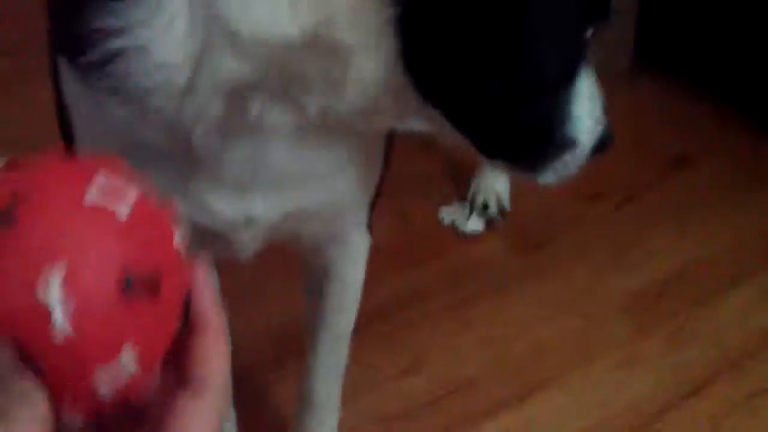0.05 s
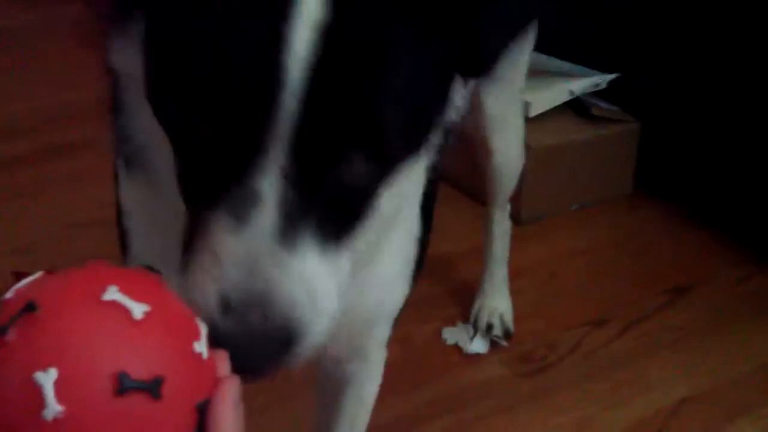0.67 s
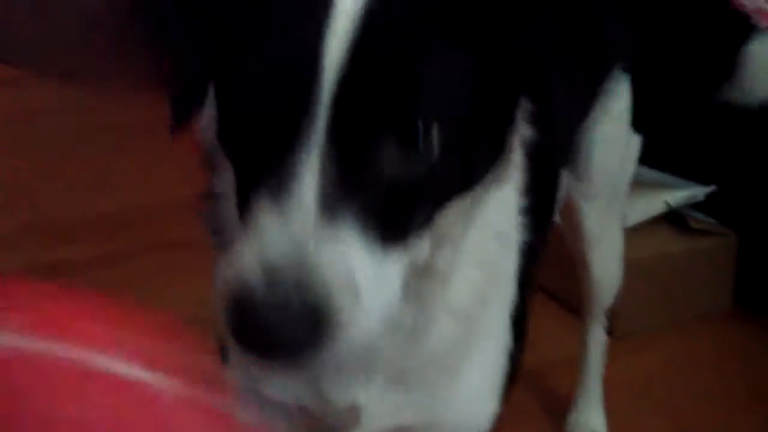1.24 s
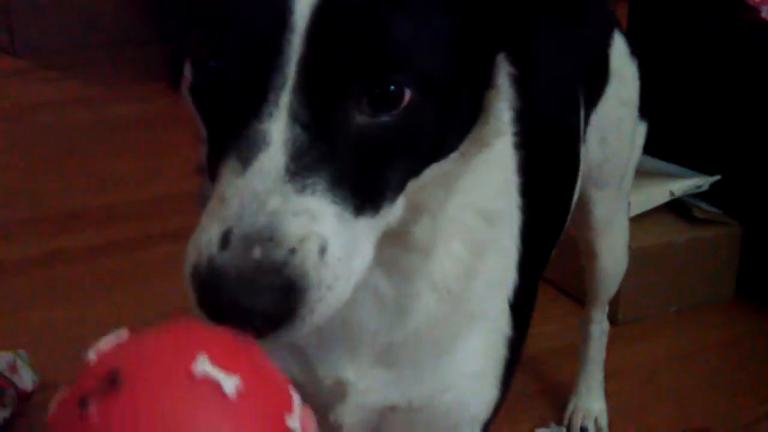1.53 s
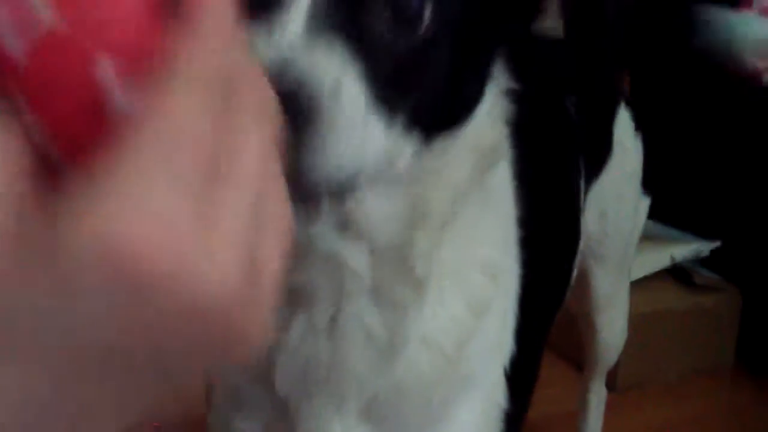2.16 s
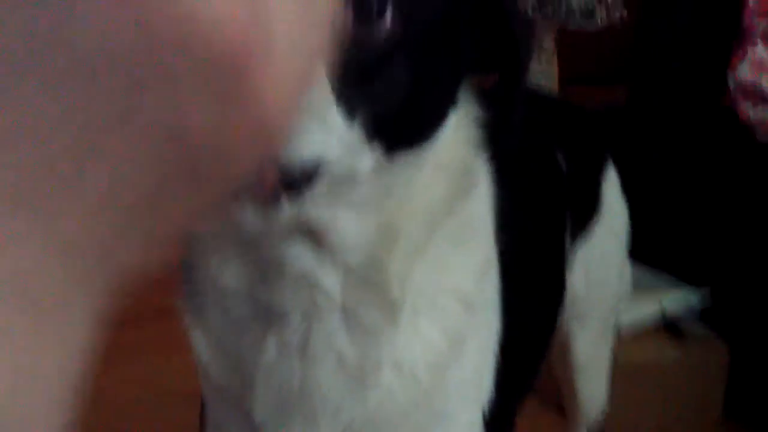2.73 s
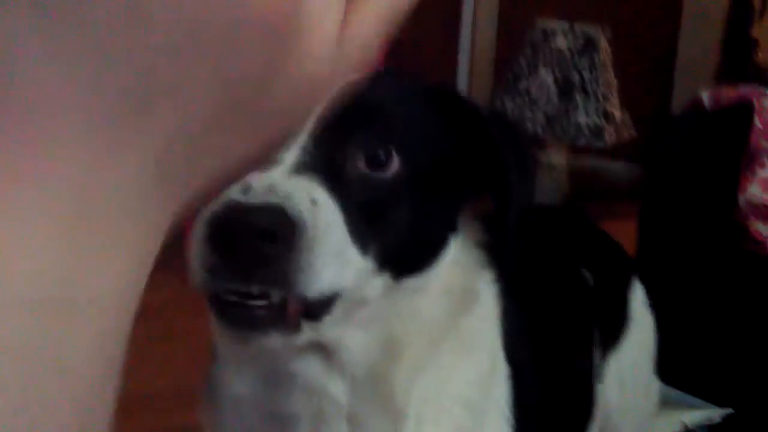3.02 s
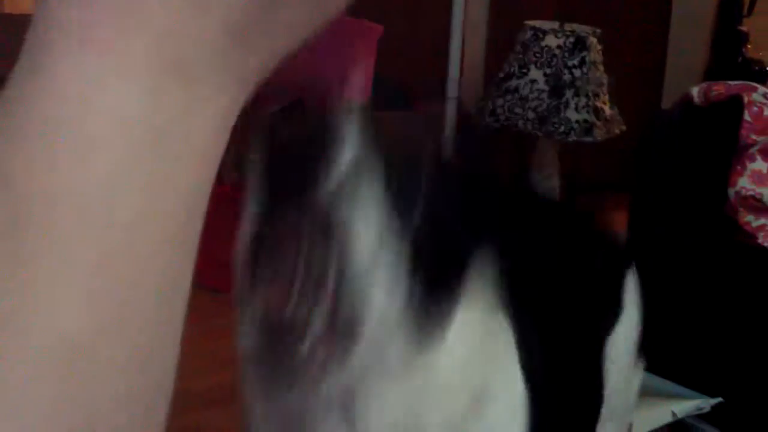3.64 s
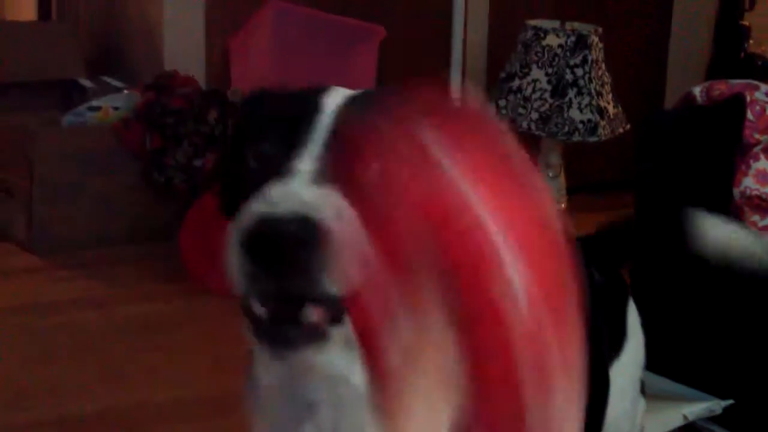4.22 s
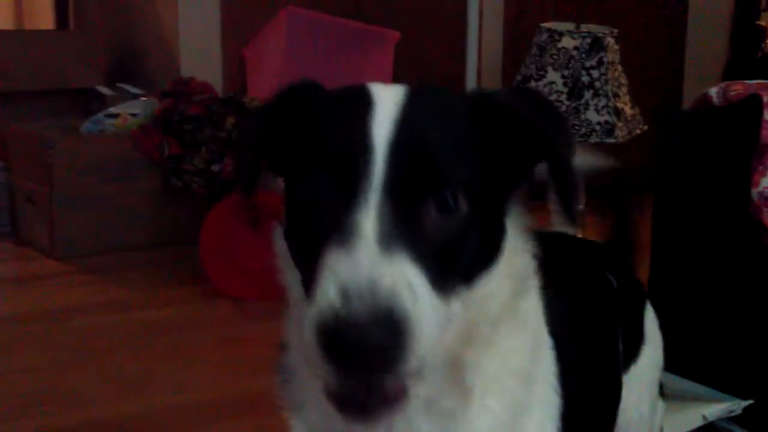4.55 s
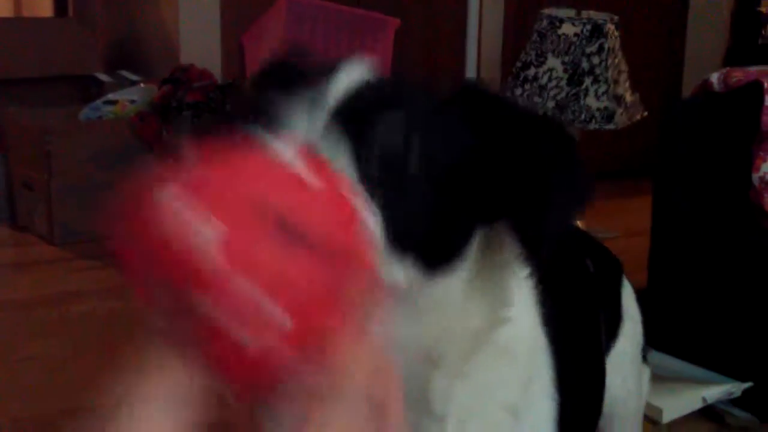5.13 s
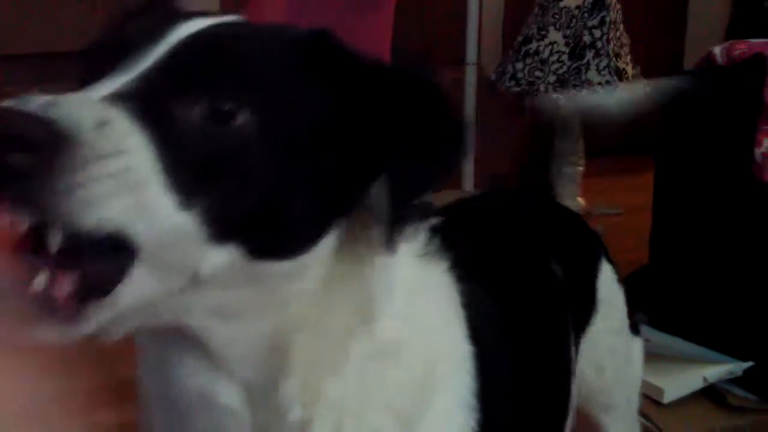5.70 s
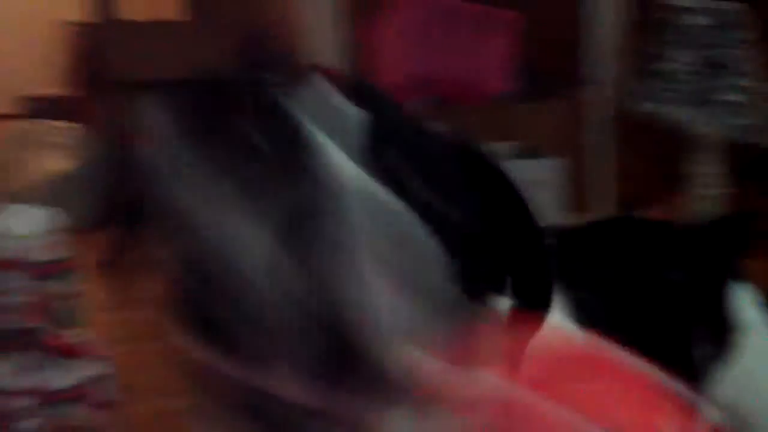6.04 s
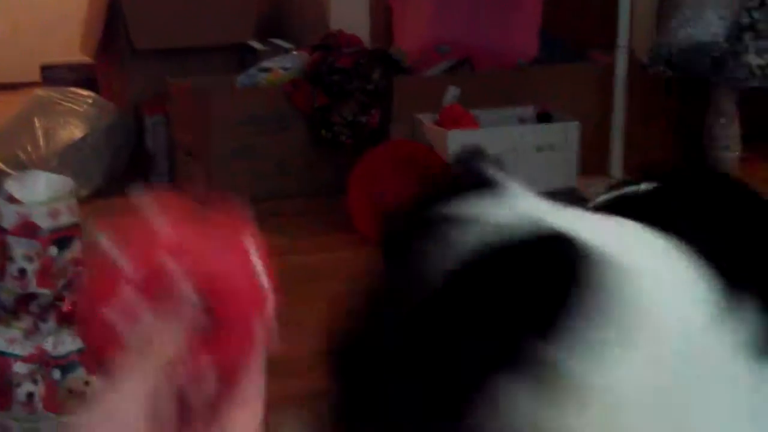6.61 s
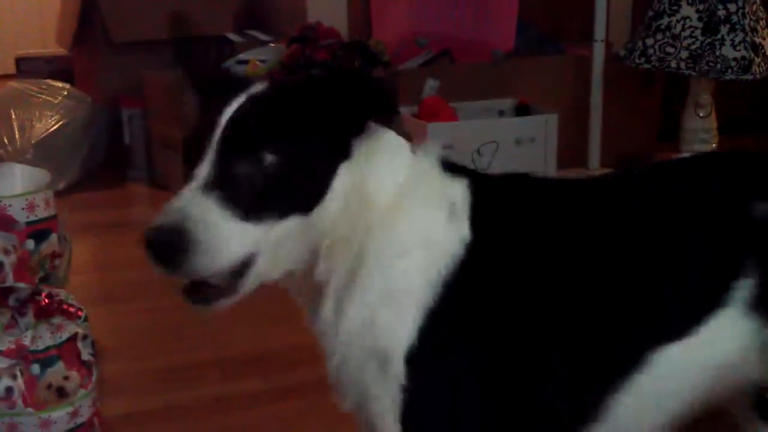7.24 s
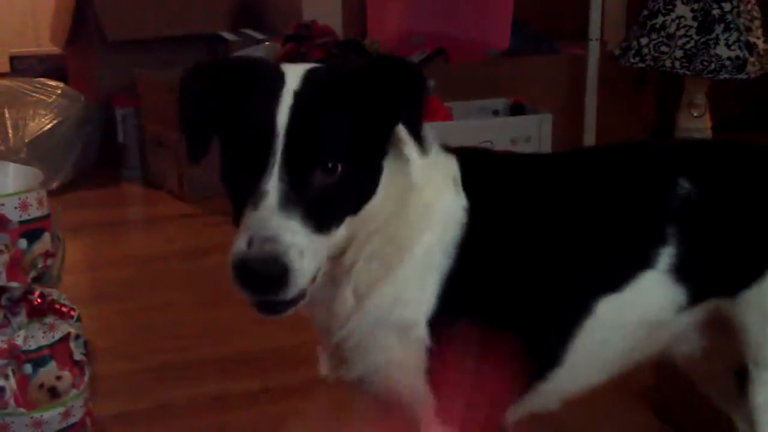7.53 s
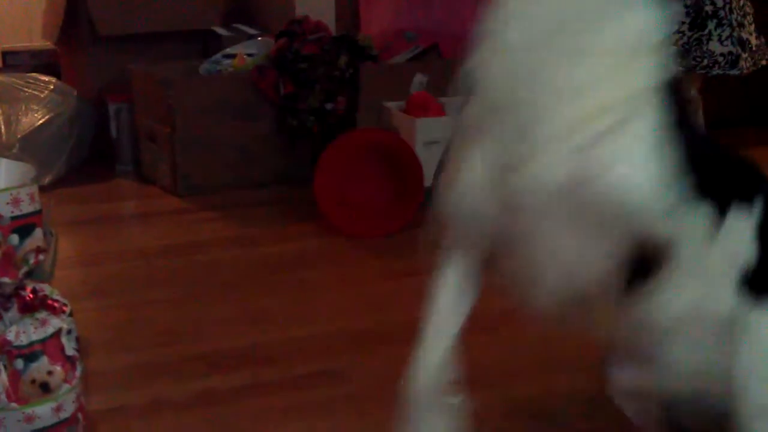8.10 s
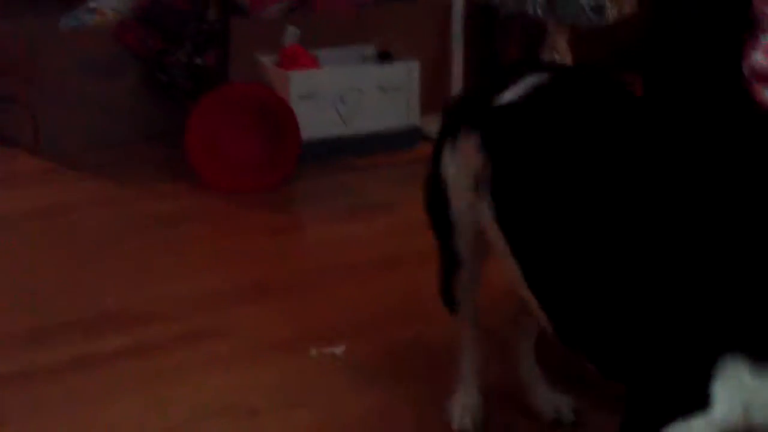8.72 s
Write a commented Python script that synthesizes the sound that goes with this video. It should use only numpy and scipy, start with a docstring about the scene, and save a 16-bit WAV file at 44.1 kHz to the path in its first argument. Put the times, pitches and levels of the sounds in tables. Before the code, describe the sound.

Close, harsh squeaks from a rubber dog ball go in and out rapidly indoors, ending with a scuff and sharp knocks on wood.

```python
"""A harsh, arching squeal, close by in a living room, then a steadier, cleaner note: a hollow rubber ball
is squeezed again and again, driving air out through a reed and sucking it back in. The reed chops the
flow into harmonics, a pipe resonance colours them, and the shell pops as it flexes. At last the ball is
thrown and a dog scrambles after it over the wooden floor. The loudest moments overload the microphones."""
import sys
import numpy as np
from scipy import signal
from scipy.fft import rfft, irfft, next_fast_len
from scipy.io import wavfile
from scipy.ndimage import uniform_filter1d

SR = 44100
rng = np.random.default_rng(int(sys.argv[2]) if len(sys.argv) > 2 else 0)


def generate_wav(signal):
    """Clip the signal to [-1, 1] and save it as 16-bit WAV at the path in sys.argv[1]."""
    frames = np.transpose(np.atleast_2d(signal))
    scaled = np.clip(frames, -1, 1) * 32767
    pcm = np.round(scaled).astype(np.int16)
    wavfile.write(sys.argv[1], SR, pcm)


N = 386316

# spectrum of the room tone: f/Hz, level/dB
ROOM_TONE_COLOUR = [(45, -43), (130, -4.5), (1000, -4.5), (3000, -18.5), (9000, -25), (12000, -50)]
# reverberation time of the room: f/Hz, t60/s
ROOM_T60 = [(200, 0.48), (1400, 0.33), (9000, 0.31)]
# balance of the two microphones: f/Hz, left minus right/dB
MIC_BALANCE = [(2300, 1.5), (5500, -0.5), (9000, -2.5)]
# rasping scuffs as the ball is thrown: peak t/s, level/dB, rise/s, fall/s
SCUFFS = [(7.747, -40, 0.014, 0.026), (7.812, -3.5, 0.012, 0.02)]
# spectrum of a scuff: f/Hz, level/dB
SCUFF_COLOUR = [(200, -24.5), (950, -9), (2000, -2), (2400, -4.5), (2800, -0.5), (3250, -9), (8000, -24.5),
                (14000, -47.5)]
# claws, paws and ball striking the floor: t/s, level/dB, t60/s, relative thump/dB
KNOCKS = [(7.548, -43.5, 0.1, -9.5), (7.578, -48, 0.7, -2.5), (8.016, -47, 0.5, -0.5),
          (8.178, -40.5, 0.16, -11.5), (8.303, -10, 0.27, -11.5), (8.319, -19.5, 0.32, 8),
          (8.463, -15, 0.07, -38), (8.502, 11.5, 0.02, -25.5), (8.524, 9, 0.02, -41),
          (8.58, -10, 0.05, -26), (8.68, -9, 0.13, -28.5), (8.698, -14.5, 0.37, -33)]
# spectrum of struck wood: f/Hz, level/dB
WOOD_COLOUR = [(150, -30), (1700, -0.5), (2800, -3.5), (4400, -0.5), (6200, -10.5), (8000, -5),
               (10500, -12.5), (14000, -40)]
# modes excited by a knock: f/Hz, level/dB, t60/s
KNOCK_MODES = [(2085, -9.5, 0.12), (3190, -5, 0.14), (4280, -2, 0.15)]
# spectrum of the thump under a knock or pop: f/Hz, level/dB
THUMP_COLOUR = [(50, -45.5), (190, -5.5), (290, -2), (440, -14.5), (770, -9), (3000, -51)]
# the shell flexing and popping back into shape: t/s, level/dB, t60/s, relative thump/dB, rise/s
POPS = [(0.481, -2.5, 0.0028, -31.5, 0.0053), (1.626, -25.5, 0.2, -9, 0.0021),
        (6.19, -18, 0.11, -19, 0.0022), (6.237, -17, 0.2, -20, 0.00093), (6.79, -1, 0.08, -25.5, 0.0087),
        (7.117, -21.5, 0.21, -28, 0.0064), (7.342, -20.5, 0.1558, -14, 0.0018)]
# spectrum of the rubber shell: f/Hz, level/dB
SHELL_COLOUR = [(400, -14.5), (900, 1.5), (9000, -0.5), (13000, -32.5)]
# air sighing in past the stalled reed until the ball is round: t/s, length/s, level/dB
SIGHS = [(0.388, 0.15, -36.5), (1.541, 0.1, -37.5), (6.093, 0.12, -29.5), (7.25, 0.1, -26)]
# spectrum of a sigh: f/Hz, level/dB
SIGH_COLOUR = [(100, -15), (900, -1), (6200, -5.5), (8100, 7.5), (12000, -34.5)]
# spectra of the turbulence, inward and outward: f/Hz, level/dB
IN_RUSH = [(450, -49.5), (4000, -2.5), (8100, 0.5), (10000, -9), (12000, -44.5)]
OUT_RUSH = [(220, -27.5), (1000, -11), (3000, -3), (7200, 2), (10500, -8), (16000, -31.5)]
# spectra of the reed before the pipe resonance, inward and outward: f/Hz, level/dB
IN_COLOUR = [(450, -54), (880, -14), (1900, -8.5), (2850, -12.5), (3800, -6.5), (6400, -12.5), (7600, -4),
             (9900, -3.5), (11400, -27.5), (16000, -55)]
OUT_COLOUR = [(400, -48.5), (850, -19), (1400, -15.5), (3000, -17.5), (7000, -6), (10300, -17),
              (12000, -37.5), (16000, -47)]
# air sucked in by the freed ball:
# t/s, length/s, top f/Hz, sag/(Hz/s), level/dB, opening accent/dB, low harmonics/dB, pipe f/Hz
REFILLS = [ (0.136, 0.26, 1117, 1036, -14, 2.5, -3, 7740), (1.217, 0.32, 1031, 386, -12.5, -4, 0, 8200),
           (1.937, 0.099, 965, 90, -10, -7.5, -0.5, 7560), (2.229, 0.086, 980, 91, -8.5, -6.5, -2.5, 8000),
           (2.475, 0.082, 983, 99.5, -9.5, -3, -1, 8300), (2.696, 0.43, 984.3, 36.4, -12, 2, -1, 8940),
           (3.378, 0.18, 954, 81, -10.5, -7.5, -2.5, 9040), (3.771, 0.17, 1001, 156, -9.5, -9.5, -1, 9300),
           (4.125, 0.13, 974, 130, -9, -14.5, 1.5, 7750), (4.412, 0.086, 955, 123, -11.5, -4, 1.5, 8040),
           (5.638, 0.48, 966.3, 132, -12, 6, -0.5, 8830), ]
# slow refills steered by the loosening hand: pipe f/Hz, rows of (t/s, f/Hz, level/dB, low harmonics/dB)
HELD_REFILLS = [ (8670, [(4.752, 914, -20, -6), (4.791, 984, -13.5, 5), (4.843, 998.6, -12, 4),
                (4.999, 936.3, -12.5, 0), (5.075, 931.4, -11, -3), (5.115, 937, -10.5, -0.5),
                (5.215, 949.3, -8.5, 0), (5.272, 950.6, -12, -2.5), (5.35, 943, -11, -2),
                (5.374, 816, -20.5, 18)]), (7650, [(6.762, 864, -33, 7), (6.796, 877, -11.5, -0.5),
                (6.838, 874, -1.5, -1.5), (7.01, 927.3, -12, -1.5), (7.06, 938, -9, -2.5),
                (7.088, 950, -15.5, 9), (7.138, 949, -10.5, -3.5), (7.224, 925, -14.5, -2.5),
                (7.25, 882, -16, 0.5), (7.272, 790, -20.5, 9)]), ]
# air pushed out, the last time as the thrown ball is struck:
# t/s, length/s, top f/Hz, crest/length, push/dB, hold/dB, low harmonics/dB, relative rush/dB, pipe f/Hz
SQUEEZES = [ (-0.04, 0.16, 1539, 0.47, 16.5, -10.5, 3, -5.5, 7670),
            (1.023, 0.2, 2748, 0.45, -0.5, -9, 0.5, 5, 7200),
            (1.698, 0.23, 2663, 0.49, 0, -10, 4, 6.5, 7140),
            (2.048, 0.17, 1640, 0.49, -4.5, -8.5, -0.5, -17, 7100),
            (2.328, 0.14, 1194, 0.47, -3.5, -8.5, -1, -23, 7000),
            (2.575, 0.099, 989, 0.4, -4, -7, 0.5, -24, 7050),
            (3.14, 0.21, 1522, 0.43, -4.5, -8.5, 3, -11, 6630),
            (3.585, 0.18, 1502, 0.48, -4.5, -10, 4, -5.5, 8550),
            (3.958, 0.15, 1185, 0.43, -4.5, -9.5, 3.5, -15, 5970),
            (4.271, 0.116, 982, 0.4, -4, -9, 1.5, -27.5, 7220),
            (4.503, 0.13, 1171, 0.46, -1.5, -12.5, 0.5, -17.5, 7050),
            (4.696, 0.055, 899, 0.17, -1.5, -13, -3.5, -15.5, 6980),
            (5.428, 0.17, 956, 0.61, -6, -11.5, 2.5, -27.5, 8600),
            (8.697, 0.037, 882, 0.21, 1, -15.5, -6, -16.5, 7000), ]

# the reed's response to each direction of flow
INWARD = dict(colour=IN_COLOUR, rush_colour=IN_RUSH, pipe_db=7, rasp_db=-3.5, hiss_db=-49.5, gasp_db=-9,
              attack_s=0.01, release_s=0.022, rush_rise_s=0.01, rush_fall_s=0.085,
              jitter=0.032, wobble=0.0014, shade_db=2.0, flutter_db=0.96)
OUTWARD = dict(colour=OUT_COLOUR, rush_colour=OUT_RUSH, pipe_db=8, rasp_db=-4, hiss_db=-24, gasp_db=-13,
               attack_s=0.0028, release_s=0.0044, rush_rise_s=0.012, rush_fall_s=0.058,
               jitter=0.025, wobble=0.003, shade_db=2.06, flutter_db=1.5)
PIPE_WIDTH_HZ, LOW_TOP_HZ, BAND_EDGE_HZ = 870, 5840, 15800
RASP_GLIDE_PER_S, RASP_LOW_DB = 17, -4  # a fast glide of log pitch rasps and starves the low harmonics
OVERBLOW_HZ, OVERBLOW_SPAN_HZ, HALF_HARMONIC_DB = 1280, 210, -15
BREAK_ARCH, BREAK_WIDTH, BREAK_JUMP = 0.66, 0.019, 0.48  # register jump, in shares of the pressure arch


def amp(db):
    """Decibels are logarithmic: 20 dB is a factor of ten in amplitude."""
    return 10 ** (np.asarray(db) / 20)


def unit(x):
    """Normalisation to rms 1."""
    return x / np.sqrt(np.mean(x ** 2))


def curve_at(points, hz):
    """Interpolation on a logarithmic frequency axis."""
    f, value = np.transpose(points)
    return np.interp(np.log(hz + 1), np.log(f), value)


def add(mix, start, sound):
    """Superposition: a stereo sound sums into the mix from its start time."""
    part = mix[:, max(round(start * SR), 0):][:, :sound.shape[1]]
    part += sound[:, :part.shape[1]]


def noise(colour, n, width=0.8):
    """Spectral shaping of white noise; width is the ratio of side to mid signal."""
    padded = next_fast_len(n, True)
    gain = amp(curve_at(colour, np.fft.rfftfreq(padded, 1 / SR)))
    mid, side = irfft(rfft(rng.standard_normal((2, padded))) * gain, padded)[:, :n]
    return unit(np.array([mid + width * side, mid - width * side]))


def drift(t, max_hz):
    """Random sinusoids beat together into a smooth fluctuation of rms near 1."""
    speeds, phases = rng.random((2, 8, 1))
    return np.sin(2 * np.pi * (max_hz * speeds * t + phases)).sum(0) / 2


def room_tone(level_db=-65.5):
    """Stationary noise forms the faint floor of the scene."""
    return amp(level_db) * noise(ROOM_TONE_COLOUR, N)


def reverberate(direct, early_db=-6.5, tail_db=-8.5):
    """Reflection: echoes from floor and furniture, and a diffuse tail that decays exponentially."""
    hz, frame_s, spectrum = signal.stft(rng.standard_normal((2, SR)), SR)
    decay = amp(-60 * frame_s / curve_at(ROOM_T60, hz)[:, None])
    tail = signal.istft(spectrum * decay, SR)[1][:, :SR]
    early = np.zeros_like(tail)
    delay_s = rng.uniform(.003, .02, size=(2, 8))
    echoes = rng.choice([-1, 1], delay_s.shape) / np.sqrt(delay_s)
    np.put_along_axis(early, (delay_s * SR).astype(int), echoes, 1)
    response = (amp(early_db) * unit(early) + amp(tail_db) * unit(tail)) / np.sqrt(SR)
    return direct + signal.fftconvolve(direct, response, axes=1)[:, :N]


def scuff(peak_s, level_db, rise_s, fall_s):
    """Friction noise swells to a peak and dies."""
    t = np.arange(-SR // 10, SR // 10) / SR
    swell = np.exp(-(np.minimum(t, 0) / rise_s) ** 2 - np.maximum(t, 0) / fall_s)
    return peak_s + t[0], noise(SCUFF_COLOUR, len(t)) * swell * amp(level_db)


def impact(colour, rise_s, start, level_db, t60, thump_db):
    """Impulsive excitation of wood or rubber: a dense, damped crack over a low thump."""
    t = np.arange(SR // 2) / SR
    crack = noise(colour, len(t)) / 1000 ** (t / t60)
    thump = noise(THUMP_COLOUR, len(t), width=0.062) * amp(thump_db - 273.6 * t)
    return start, amp(level_db) * (crack + thump) * (1 - np.exp(-t / rise_s))


def floor_ring(start, level_db, decay_s, thump_db, ring_db=-8, boom_hz=250, boom_db=-3, boom_t60=0.16):
    """Modal vibration: a hard knock rings the high modes; a soft, thumping one makes the floor boom."""
    t = np.arange(SR // 2) / SR
    modes = sum(amp(db - 60 * t / t60) * np.sin(2 * np.pi * (hz * t + rng.random((2, 1))))
                for hz, db, t60 in KNOCK_MODES)
    ring = modes * amp(ring_db) * np.exp(-t / decay_s) / (1 + amp(thump_db))
    boom = amp(thump_db + boom_db) * np.sin(2 * np.pi * boom_hz * t) / 1000 ** (t / boom_t60)
    return start, amp(level_db) * (ring + boom)


def sigh(start, length, level_db, grain_db=2.5):
    """Turbulence in the open vent makes a soft, rustling draught."""
    t = np.arange(0, length, 1 / SR)
    draught = noise(SIGH_COLOUR, len(t)) * signal.windows.tukey(len(t), .5)
    return start, draught * amp(level_db + grain_db * drift(t, 120))


def overblow(hz):
    """Period doubling: the degree, 0 to 1, to which the overblown reed beats strong-weak."""
    return np.clip((hz - OVERBLOW_HZ) / OVERBLOW_SPAN_HZ, 0, 1)


def reed(stroke, pipe_hz, rush_db, *, colour, rush_colour, pipe_db, rasp_db, hiss_db, gasp_db,
         attack_s, release_s, rush_rise_s, rush_fall_s, jitter, wobble, shade_db, flutter_db):
    """Source and filter: the reed chops the flow into harmonics and the pipe resonance colours them.
    Stroke columns: t/s, f/Hz, level/dB, low harmonics/dB."""
    times, pitch, level_db, low_db = np.transpose(stroke)
    t = np.arange(times[0], times[-1] + 0.067, 1 / SR)
    age, left = t - times[0], times[-1] - t
    hz = uniform_filter1d(np.interp(t, times, pitch), size=600, mode="nearest")
    rasp = np.tanh(abs(np.gradient(np.log(hz))) * SR / RASP_GLIDE_PER_S)
    # turbulence swells early in the stroke and shakes the pitch
    surge = np.exp(-(age / rush_fall_s) ** 2) * (1 - np.exp(-(age / rush_rise_s) ** 2))
    air = amp(rush_db) * surge + amp(hiss_db) + amp(rasp_db) * rasp ** 2
    slow_t, slow_hz = t[::32], hz[::32]
    slow_low_db = np.interp(slow_t, times, low_db) + RASP_LOW_DB * rasp[::32]
    shake = jitter * (air + rasp ** 2) * np.interp(t, slow_t, drift(slow_t, 400))
    shake += wobble * np.interp(t, slow_t, drift(slow_t, 70))
    cycles = np.cumsum(hz * (1 + shake)) / SR
    half_gain = amp(HALF_HARMONIC_DB) * overblow(slow_hz) * np.clip(1 + drift(slow_t, 35), 0, 2)
    tone = power = 0
    for k in np.arange(1, BAND_EDGE_HZ / hz.min(), .5 if half_gain.any() else 1):
        f = k * slow_hz
        gain_db = curve_at(colour, f) + slow_low_db * np.exp(-(f / LOW_TOP_HZ) ** 6)
        gain_db += pipe_db * np.exp(-((f - pipe_hz) / PIPE_WIDTH_HZ) ** 2)
        # the moving hand shades each harmonic and shifts it between left and right
        gain_db += shade_db * drift(slow_t, 7) + flutter_db * drift(slow_t, 60)
        shift = np.interp(t, slow_t, 0.78 * np.sqrt(k / 8) * drift(slow_t, 2))
        height = np.interp(t, slow_t, amp(gain_db) * (f < SR / 2) * (half_gain if k % 1 else 1))
        phase = 2 * np.pi * k * cycles + 0.3 * k * k  # the cavity smears each pulse
        tone = tone + height * np.cos(np.float32([phase + shift, phase - shift]))
        power = power + height ** 2 / 2
    speaking = np.clip(left / release_s, 0, 1)  # the reed stalls as the pressure runs out
    gasp = amp(gasp_db - 272 * abs(left))  # air slips on past the stalled reed
    rush = (air + gasp) * noise(rush_colour, len(t))
    sound = (speaking * tone / np.sqrt(power) + rush) / np.sqrt(1 + air ** 2)  # a strong rush chokes it
    edges = np.minimum(age / attack_s, 1) ** 2 * np.minimum(age[::-1] / 0.099, 1)
    return times[0], sound * edges * amp(np.interp(t, times, level_db))


def refill(start, length, top_hz, sag_hz_per_s, level_db, accent_db, low_db,
           open_s=0.014, close_s=0.019, accent_s=0.04, fade_s=0.034, fade_db=-12):
    """Elastic recovery drives the inward stroke: suction builds, sags as the ball rounds out, then ends."""
    age = np.arange(0, length, 1 / SR)
    left = length - age
    flat = 0.1 * np.exp(-age / open_s) + 0.22 * np.exp(-left / close_s)  # weak suction lowers the pitch
    hz = (top_hz - sag_hz_per_s * age) * (1 - flat)
    swell_db = accent_db * np.exp(-age / accent_s) + fade_db * np.exp(-left / fade_s)
    return np.column_stack([start + age, hz, level_db + swell_db, np.full(len(age), low_db)])


def squeeze(start, length, top_hz, crest, push_db, hold_db, low_db,
            onset_hz=874.5, stall_hz=818, push_share=0.42, grip_db=-1.5, spent_db=-5.5):
    """Pitch follows pressure in the outward stroke: a hard push, an easier hold, then the air is spent."""
    t = np.arange(max(start, 0), start + length, 1 / SR)
    done = (t - start) / length
    skewed = done ** (np.log(.5) / np.log(crest))
    arch = abs(np.sin(np.pi * skewed)) ** 1.4
    upper_register = (1 + np.tanh((arch - BREAK_ARCH) / BREAK_WIDTH)) / 2
    arch += overblow(top_hz) * BREAK_JUMP * (1 - arch) * upper_register
    slack_hz = onset_hz + (stall_hz - onset_hz) * done
    hz = slack_hz + (top_hz - slack_hz) * arch
    level_db = np.interp(done, [0, push_share * crest, crest, 1],
                         [push_db + grip_db, push_db, hold_db, hold_db + spent_db])
    return np.column_stack([t, hz, level_db, np.full(len(t), low_db)])


def scene():
    """Superposition of squeaks, sighs, pops and the scramble in one reverberant room."""
    mix = np.zeros((2, N))
    for *gesture, rush_db, pipe_hz in SQUEEZES:
        add(mix, *reed(squeeze(*gesture), pipe_hz, rush_db, **OUTWARD))
    free_refills = [(pipe_hz, refill(*gesture)) for *gesture, pipe_hz in REFILLS]
    for pipe_hz, stroke in free_refills + HELD_REFILLS:
        add(mix, *reed(stroke, pipe_hz, rush_db=-15.5, **INWARD))
    for row in SIGHS:
        add(mix, *sigh(*row))
    for *row, rise_s in POPS:
        add(mix, *impact(SHELL_COLOUR, rise_s, *row))
    for row in KNOCKS:
        add(mix, *impact(WOOD_COLOUR, 0.0011, *row))
        add(mix, *floor_ring(*row))
    for row in SCUFFS:
        add(mix, *scuff(*row))
    return reverberate(mix) + room_tone()


def record(dry, ceiling=0.84, low_cut_hz=55, dropout_s=(4.582, 4.694)):
    """Saturation: two band-limited microphones of unequal colour clip on peaks; the sound cuts out once."""
    t = np.arange(N) / SR
    balance_db = curve_at(MIC_BALANCE, np.fft.rfftfreq(N, 1 / SR))
    heard = irfft(rfft(dry) * amp([balance_db / 2, -balance_db / 2]), N)
    clipped = np.clip(heard, -ceiling, ceiling)
    high_passed = signal.lfilter(*signal.butter(2, low_cut_hz, "high", fs=SR), clipped)
    live = (t < dropout_s[0]) | (t > dropout_s[1])
    low_pass = signal.firwin(255, BAND_EDGE_HZ, window="blackman", fs=SR)
    return signal.oaconvolve(high_passed * live, low_pass[None], "same", axes=1)


dry = scene()
out = record(dry)
generate_wav(out)
```